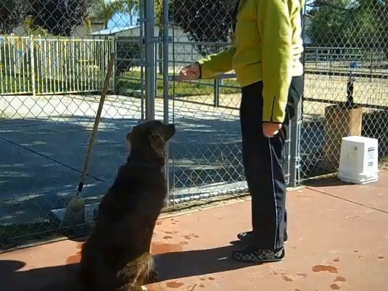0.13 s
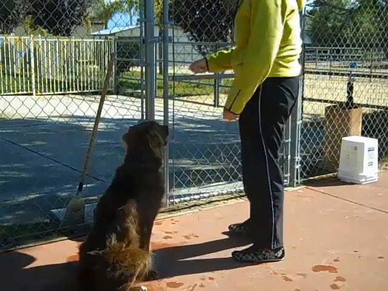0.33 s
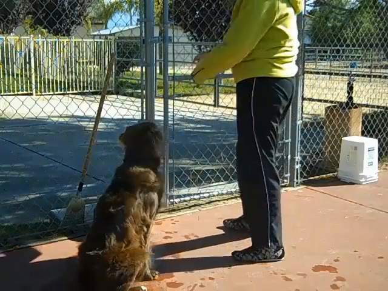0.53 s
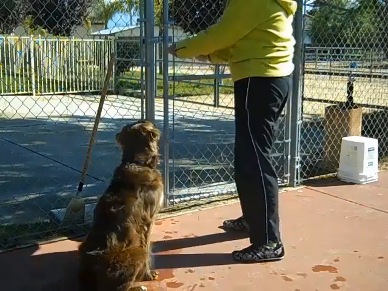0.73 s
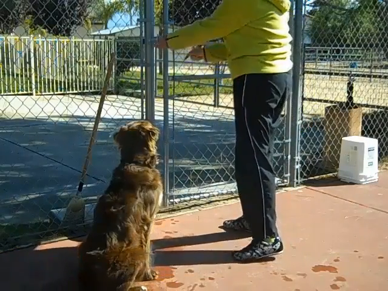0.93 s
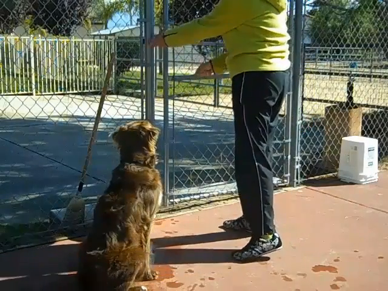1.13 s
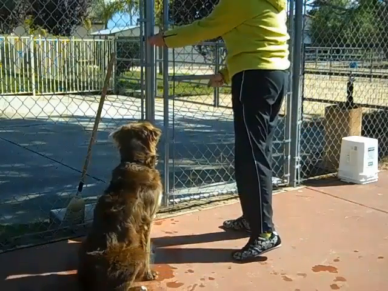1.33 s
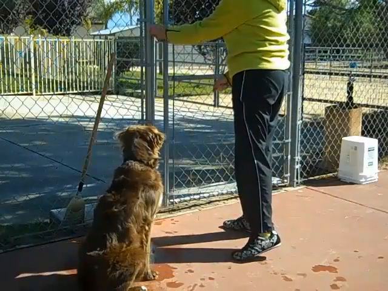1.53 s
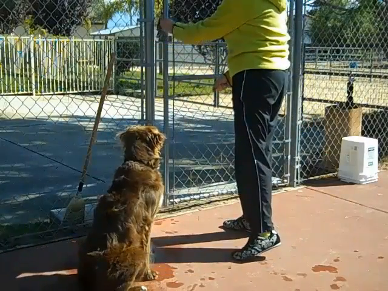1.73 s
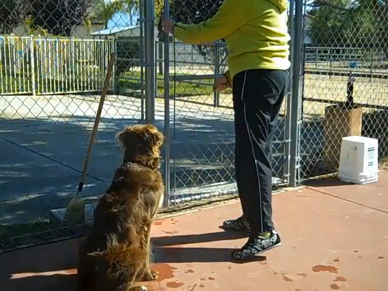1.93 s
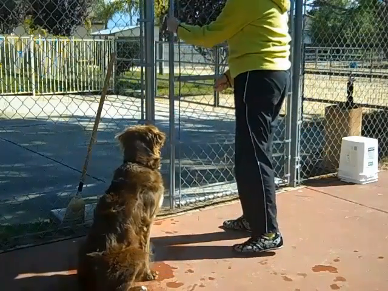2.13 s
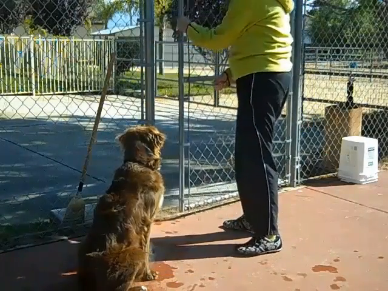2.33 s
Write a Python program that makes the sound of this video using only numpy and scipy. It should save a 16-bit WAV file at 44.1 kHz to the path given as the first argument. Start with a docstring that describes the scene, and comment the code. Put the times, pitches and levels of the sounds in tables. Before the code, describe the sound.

A chain-link gate latch clinks twice near the microphone, taps the post, then clanks loudly and rings briefly. Before it, a shoe scuffs softly, a small bird chirps once and a sleeve rustles in the quiet outdoor air.

```python
"""Latching a chain-link gate

A hand works a metal latch in a quiet yard: two light clinks, a few nudges of the post, then one loud
clank on the frame. Each impact excites damped modes of the metal and shakes the wire mesh.
Before it a shoe scuffs, a small bird chips once and a sleeve rustles; a faint hum and a breeze
lie underneath."""
import sys
import numpy as np
from scipy import signal
from scipy.fft import rfft, irfft
from scipy.io import wavfile

SR = 44100
rng = np.random.default_rng(int(sys.argv[2]) if len(sys.argv) > 2 else 0)


def to_wav(s):
    """Save 16-bit WAV."""
    ch = np.atleast_2d(s).T  # columns
    pcm = np.round(np.clip(ch, -1, 1) * 32767)  # PCM
    wavfile.write(sys.argv[1], SR, pcm.astype(np.int16))


N = 109720
T = np.arange(N) / SR
HZ = np.fft.rfftfreq(N, 1 / SR)


def amp(db):
    """Decibels to amplitude ratio."""
    return 10 ** (np.asarray(db) / 20)


def unit_rms(x):
    """Normalisation to rms 1."""
    return x / np.sqrt(np.mean(x ** 2) + 1e-20)


def curve(points, hz=HZ):
    """Interpolation on a log-frequency axis."""
    f, value = np.transpose(points)
    return np.interp(np.log(hz + 1), np.log(f + 1), value)


def envelope(points):
    """Gain over time, interpolated in decibels."""
    return amp(np.interp(T, *np.transpose(points)))


def add(mix, start_s, sound):
    """Superposition of a sound on the stereo mix."""
    part = mix[:, round(start_s * SR):][:, :sound.shape[1]]
    part += sound[:, :part.shape[1]]


def noise(spectrum_db, coherence):
    """Partially coherent stereo noise of rms 1; the spectrum sets only its colour."""
    shared, independent = rfft(rng.standard_normal((2, N)))
    c = np.clip(coherence, -1, 1)
    right = c * shared + np.sqrt(1 - c * c) * independent
    return unit_rms(irfft(np.array([shared, right]) * amp(spectrum_db), N))


def wander(rate_hz):
    """Random modulation: low-passed noise of rms 1."""
    return unit_rms(irfft(rfft(rng.standard_normal(N)) * np.exp(-(HZ / rate_hz) ** 2), N))


# spectrum of the outdoor wash: frequency_hz, density_db
AIR_SPECTRUM = [(15, -43.5), (25, -16.5), (63, -3.5), (91, -10.5), (122, -2.5), (160, -10.5), (244, -12.5),
                (425, -14.5), (460, -15.5), (632, -14.5), (2500, -26.5), (6500, -29), (14000, -36)]
# its left-right similarity: frequency_hz, coherence
AIR_COHERENCE = [(25, 1), (125, 0.8), (300, 0.61), (1000, 0.56), (4000, 0.17), (14000, 0.1)]

def air(level_db=-55):
    """Diffuse field: a distant wash whose coherence falls with frequency."""
    return amp(level_db + 0.35 * wander(20)) * noise(curve(AIR_SPECTRUM), curve(AIR_COHERENCE))


# swell of the hum: time_s, level_db
HUM_LEVEL = [(0, -71), (1.1, -66.5), (1.6, -63), (2.49, -61.5)]

def hum(pitch_hz=129.3, waver_hz=2.96):
    """Random frequency and amplitude modulation make a low tone waver."""
    phase = 2 * np.pi * np.cumsum(pitch_hz + waver_hz * wander(8)) / SR
    return envelope(HUM_LEVEL) * unit_rms(np.sin(phase) * amp(2 * wander(4.6)))


# gusts: time_s, level_db
BREEZE_LEVEL = [(0, -89), (2.0, -58.5), (2.06, -51.5), (2.14, -50), (2.22, -65.5), (2.36, -55), (2.49, -54)]
# their spectrum: frequency_hz, density_db
BREEZE_SPECTRUM = [(20, -8), (45, 0), (75, -4), (130, -21), (400, -44), (2000, -79)]

def breeze():
    """Turbulence: the pressure fluctuations of a breeze rumble, stronger on the right."""
    return noise(curve(BREEZE_SPECTRUM), coherence=0.29) * envelope(BREEZE_LEVEL) * amp([[-2.5], [2]])


# drag of the sole: time_s, level_db
SCUFF_LEVEL = [(0, -60.5), (.04, -64.5), (.09, -59), (.13, -63), (.18, -57.5), (.23, -79), (.34, -68),
               (.38, -88), (2.49, -91.5)]
# its spectrum: frequency_hz, density_db
SCUFF_SPECTRUM = [(200, -18), (900, -2), (2200, -4), (3500, -5.5), (6000, -11.5), (14000, -31.5)]

def shoe():
    """Sliding friction: a sole drags lightly over gritty paving."""
    return noise(curve(SCUFF_SPECTRUM), coherence=0.33) * envelope(SCUFF_LEVEL) * amp(1.8 * wander(120))


# rustle of the cloth: time_s, level_db
RUSTLE_LEVEL = [(0, -65), (.17, -63), (.26, -74), (.35, -62.5), (.5, -68), (.63, -58), (.69, -63),
                (.72, -53), (.77, -56.5), (.83, -56.5), (.9, -62.5), (1.03, -64.5), (2.3, -65.5),
                (2.39, -61), (2.49, -68.5)]
# its spectrum: frequency_hz, density_db
RUSTLE_SPECTRUM = [(300, 0.5), (1500, -25), (3500, -6.5), (5200, -4.5), (7000, 1.5), (8200, -1),
                   (10000, -18.5), (14000, -17)]

def sleeve(swish_start_s=0.694, swish_s=0.055, swish_hz=6150, sweep_hz_per_s=24000, swish_db=-57):
    """Friction noise: cloth slides in uneven grains as the arm reaches out, with one rising swish."""
    out = noise(curve(RUSTLE_SPECTRUM), coherence=0.36) * envelope(RUSTLE_LEVEL) * amp(1.56 * wander(75))
    t = T[T < swish_s]
    carrier = np.sin(2 * np.pi * np.cumsum(swish_hz + sweep_hz_per_s * t) / SR)
    band = unit_rms(wander(400)[:len(t)] * carrier)
    add(out, swish_start_s, (amp(swish_db) * band * np.sin(np.pi * t / swish_s))[None])
    return out


# the bird's two voices: start_s, length_s, pitch_hz, level_db
BIRD_VOICES = [(0.374, 0.028, 6760, -41), (0.374, 0.024, 6420, -47.5)]

def bird(drop_hz=1900, drop_s=0.00193):
    """Beating: two close whistles drop onto their pitches and interfere."""
    out = np.zeros((2, N))
    for start_s, length_s, pitch_hz, level_db in BIRD_VOICES:
        t = T[T < length_s]
        glide_hz = pitch_hz + drop_hz * np.exp(-t / drop_s) + 40 * wander(270)[:len(t)]
        arch = amp(level_db) * np.sin(np.pi * t / length_s) ** 0.63
        add(out, start_s, (arch * np.sin(2 * np.pi * np.cumsum(glide_hz) / SR))[None])
    return out


CONTACT_RISE_S = 0.00039
# left-right similarity of ticks and blows: frequency_hz, coherence
CONTACT_COHERENCE = [(100, 0.75), (2000, 1), (4500, 0.74), (7000, 0.97), (14000, 0.53)]
# ticks of hand, shoe and fittings: start_s, level_db, centre_hz, width_octaves, t60_s
TICKS = [(.646, -51, 6000, .2, .04), (.738, -57, 4300, .4, .04), (.741, -56, 5160, .03, 0.061),
         (0.831, -47, 5200, .35, .028), (.868, -52, 6250, .05, .035), (.915, -58, 5250, .04, 0.054),
         (.964, -62, 5250, .05, .08), (1.347, -53, 5200, 0.36, 0.056), (1.701, -46, 8000, .4, .04),
         (1.714, -42, 8160, 0.16, 0.027), (2.268, -53.5, 350, 1.4, 0.13), (2.4058, -40, 3980, 0.62, 0.0083)]

def ticks():
    """Damped transients: each brief contact radiates a fast-decaying band of noise."""
    out = np.zeros((2, N))
    attack = 1 - np.exp(-T / CONTACT_RISE_S)
    for start_s, level_db, centre_hz, width_octaves, t60_s in TICKS:
        band_db = np.maximum(-4 * (np.log2((HZ + 1) / centre_hz) / width_octaves) ** 2, -40)
        band = noise(band_db, curve(CONTACT_COHERENCE))
        add(out, start_s, band * amp(level_db - 60 * T / t60_s) * attack)
    return out


def ring(modes, ring_db, beat_depth=0.55):
    """Modal vibration: damped sinusoids, each fluttering because the joints are loose."""
    t = T[:SR]
    phases = rng.random((len(modes), 1, 1)) + 0.063 * rng.standard_normal((len(modes), 2, 1))
    beat_hz = rng.uniform(15, 70, (len(modes), 1))
    beats = 1 + beat_depth * np.sin(2 * np.pi * (beat_hz * t + rng.random((len(modes), 1))))
    return sum(amp(ring_db + db - 60 * t / t60_s) * beat * np.sin(2 * np.pi * (hz * t + phase))
               for (hz, db, t60_s), phase, beat in zip(modes, phases, beats))


# decay of the wire mesh: frequency_hz, t60_s
MESH_DECAY = [(200, 0.7), (1500, 0.45), (2800, 0.5), (3400, 0.45), (4200, 0.48), (4900, 0.32), (6000, 0.36),
              (8000, 0.33), (14000, 0.55)]

def mesh(spectrum_db, rattle_db, flutter_db=1.5, rise_s=0.0071):
    """Frequency-dependent damping: the shaken mesh rattles, each band dying at its own rate."""
    excitation = noise(spectrum_db, curve(CONTACT_COHERENCE))[:, :SR]
    hz, age_s, bands = signal.stft(excitation, SR, nperseg=256)
    decay = amp(-60 * age_s / curve(MESH_DECAY, hz)[:, None])
    rattle = signal.istft(bands * decay, SR)[1][:, :SR]
    return rattle * amp(rattle_db + flutter_db * wander(130)[:SR]) * (1 - np.exp(-T[:SR] / rise_s))


def impacts(hits, modes, spectrum, crack_t60_s, resonance_db=6.5, half_width_hz=29):
    """Impulse response of metal: each blow gives a crack of dense overtones, a ring and a rattle."""
    out = np.zeros((2, N))
    t = T[:SR]
    attack = 1 - np.exp(-t / CONTACT_RISE_S)
    peaks = np.max([1 / (1 + ((HZ - hz) / half_width_hz) ** 2) for hz, _, _ in modes], axis=0)
    body_db = curve(spectrum) + resonance_db * peaks  # crack and rattle swell around each mode
    octaves = np.log2(np.maximum(np.fft.rfftfreq(SR, 1 / SR), 1200) / 4500)  # tilt pivots at 4500 Hz
    for start_s, level_db, tilt_db_per_octave, ring_db, rattle_db in hits:
        crack = noise(body_db, curve(CONTACT_COHERENCE))[:, :SR] * amp(-60 * t / crack_t60_s)
        blow = crack + ring(modes, ring_db) + mesh(body_db, rattle_db)
        tilted = irfft(rfft(blow) * amp(tilt_db_per_octave * octaves), SR)
        add(out, start_s, amp(level_db) * tilted * attack)
    return out


# nudges: start_s, level_db, tilt_db_per_octave, ring_db, rattle_db
POST_HITS = [(1.496, -53, -4.8, -4, -4.5), (1.6038, -40, -0.51, -0.5, -2), (1.688, -47.5, -1.6, -2.5, 4)]
# ring of the post: pitch_hz, level_db, t60_s
POST_MODES = [(1382, -15, .35), (2312, -16, .25), (2445, -14, .4), (2640, -16, .4), (2750, -14, .45),
              (3223, -1, .18), (3870, -14, .7), (4090, -9, .8), (4400, -14, .3)]
# its dense overtones: frequency_hz, density_db
POST_SPECTRUM = [(200, -29.5), (650, -6), (1100, -8.5), (1500, -8), (2500, -2), (3300, -8), (4400, -2),
                 (6000, -3.5), (7800, -8), (9500, -24), (14000, -45.5)]

def post():
    """Free vibration: the post rings on after each nudge of the latch fork."""
    return impacts(POST_HITS, POST_MODES, POST_SPECTRUM, crack_t60_s=0.073)


# clinks: start_s, level_db, tilt_db_per_octave, ring_db, rattle_db
LATCH_HITS = [(1.1848, -27.5, 2.5, -4, -21.5), (1.1925, -33, -2, -15.5, -9.5),
              (1.1985, -42.5, -7, -6, -10.5), (1.366, -62.5, -4.5, 10, -17), (1.3926, -31, -0.5, -9, -8.5),
              (1.4025, -31.5, -3.5, -6.5, -20), (1.5754, -46, 0, -12, -5)]
# ring of the lever: pitch_hz, level_db, t60_s
LATCH_MODES = [(816, -17, 0.074), (1173, -16, 0.22), (2730, -26.5, 0.71), (3414, -22, 0.23),
               (3850, -14.5, 0.19), (4060, -11.5, 0.19), (4200, -33, 0.3), (4410, -9.5, 0.14),
               (6210, 4, 0.12), (6168, -9, .24), (6150, -16, 0.1), (5950, -16, 0.22), (7530, -18, 0.068),
               (7520, -2.5, 0.098), (7700, -4.5, 0.072), (9900, -10.5, 0.057)]
# its dense overtones: frequency_hz, density_db
LATCH_SPECTRUM = [(200, -24.5), (800, -14), (1200, -17.5), (1650, -19), (2000, -11.5), (2700, -15),
                  (3100, -18.5), (3450, -10), (4100, -11), (4500, -7), (4900, -12), (5600, -8.5),
                  (6300, 1.5), (6800, -2), (7050, -8), (7550, -1), (8100, -5.5), (8800, -20.5),
                  (10000, -18), (10600, -25.5), (14000, -36)]

def latch():
    """Impact excitation: the small lever touches its catch and rings in high modes."""
    return impacts(LATCH_HITS, LATCH_MODES, LATCH_SPECTRUM, crack_t60_s=0.07)


# first touch, blow, bounce, soft settling: start_s, level_db, tilt_db_per_octave, ring_db, rattle_db
FRAME_HITS = [(1.811, -15.5, 1.5, -6.5, -27), (1.8131, -11.5, 0.99, -3, -13.5),
              (1.8188, -16.5, 0.5, -20.5, -12), (2.18, -69, -5.5, 18, -8)]
# ring of the gate's tubes: pitch_hz, level_db, t60_s
FRAME_MODES = [(1314, -25, .2), (1470, -26, .28), (1547, -26, .2), (2125, -25, .32), (2458, -23, .32),
               (2706, -18, .48), (2745, -18, .33), (2804, -18, .22), (2841, -22, .38), (3035, -19, .3),
               (3678, -21, .2), (4101, -19, .43), (4160, -20, .35), (4193, -14, .2), (4240, -16, .49),
               (4263, -18, .36), (4430, -18, .2), (4908, -16, .2), (5305, -15, .2), (5695, -17, .2),
               (5778, -18, .2), (7275, -9, .13), (7497, -18, .24), (7612, -20, .22), (7833, -18, .22),
               (8875, -15, .1)]
# their dense overtones: frequency_hz, density_db
FRAME_SPECTRUM = [(100, -32), (280, -18.5), (480, -20.5), (1100, -13), (1320, -10), (1550, -10.5),
                  (1850, -9), (2150, -9), (2750, -3.5), (3050, -5), (3350, -10.5), (3700, -5.5), (4250, -3),
                  (4650, -2.5), (5350, -1), (5900, -1), (6950, -4), (7270, -2), (7900, 0.5), (8550, -13),
                  (8880, -6.5), (9300, -18), (10700, -25.5), (11600, -22), (12300, -27), (14000, -27)]

def frame():
    """Inharmonic resonance: the latch strikes the tubular frame, which clanks as close modes beat."""
    return impacts(FRAME_HITS, FRAME_MODES, FRAME_SPECTRUM, crack_t60_s=0.1)


def yard_echoes(x, level_db=-16.5, t60_s=0.24, echoes_per_s=1500):
    """Reverberation: faint scattered reflections from paving and fences."""
    t = T[:SR // 2]
    taps = rng.standard_normal((2, len(t))) * (rng.random((2, len(t))) < echoes_per_s / SR)
    tail = (taps + 0.27 * taps[::-1]) * amp(-60 * t / t60_s) * (t > 0.005)
    return amp(level_db) * signal.fftconvolve(x, tail / np.linalg.norm(tail[0]), axes=1)[:, :N]


# stereo balance of the near sounds: frequency_hz, left_minus_right_db
BALANCE = [(100, 1), (4500, 0.5), (5700, -3.5), (6200, -10), (6900, 1), (7450, 18), (9000, 12), (14000, 22)]

def scene():
    """Superposition: near sounds and their echoes, the upper treble leaning left, over the background."""
    near = latch() + post() + frame() + shoe() + ticks() + bird() + sleeve()
    lean = amp(curve(BALANCE))
    pan = np.array([lean, np.ones_like(lean)]) * 2 / (1 + lean)
    return irfft(rfft(near + yard_echoes(near)) * pan, N) + air() + hum() + breeze()


def record(dry):
    """Band limiting: a linear-phase low-pass at 14250 Hz."""
    lowpass = signal.firwin(255, 14250, window=("kaiser", 8), fs=SR)
    return signal.oaconvolve(dry, lowpass[None], "same")


dry = scene()
out = record(dry)
to_wav(out)
```